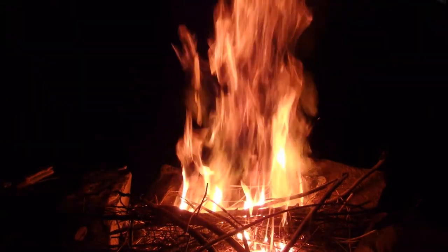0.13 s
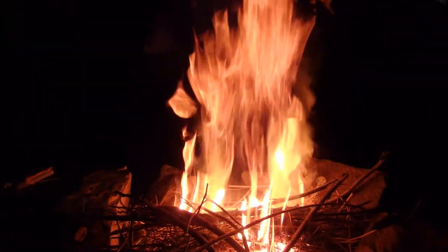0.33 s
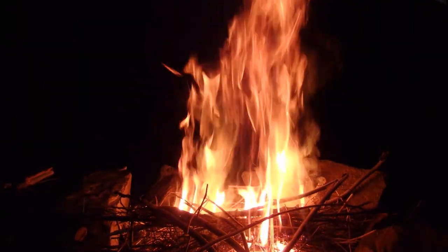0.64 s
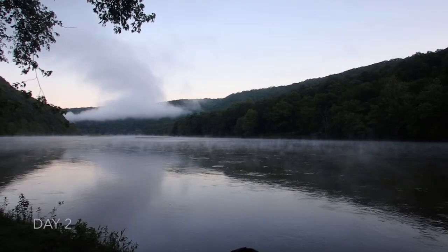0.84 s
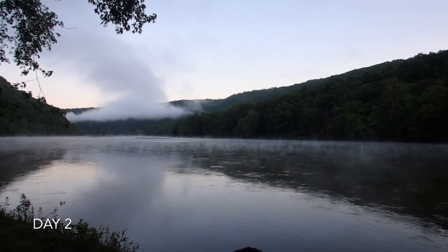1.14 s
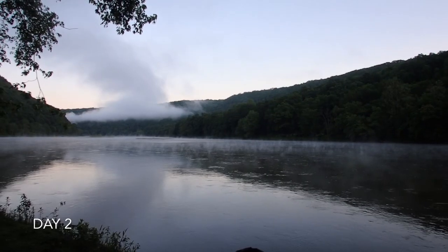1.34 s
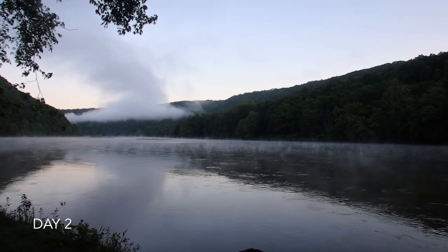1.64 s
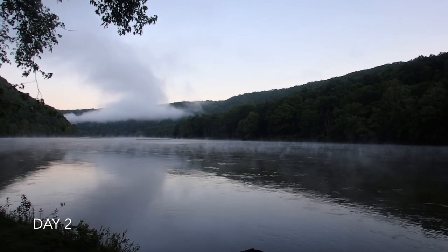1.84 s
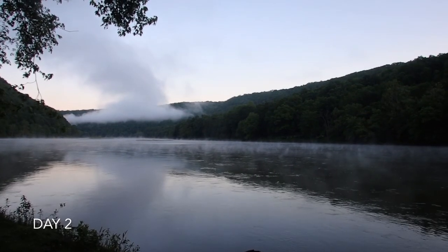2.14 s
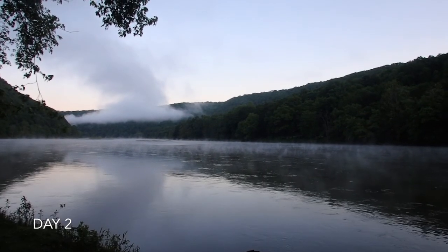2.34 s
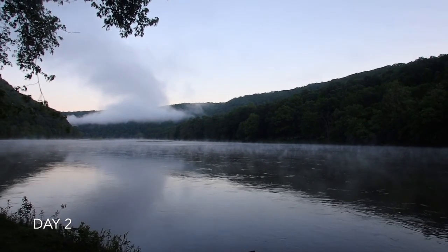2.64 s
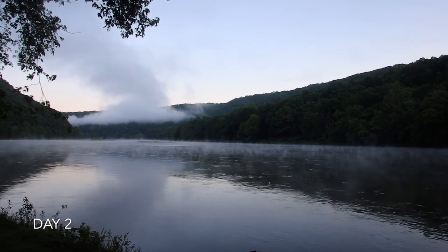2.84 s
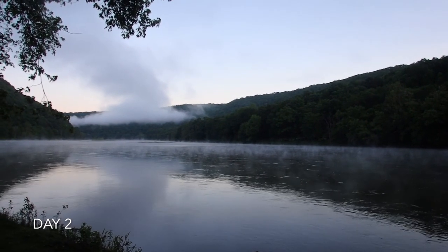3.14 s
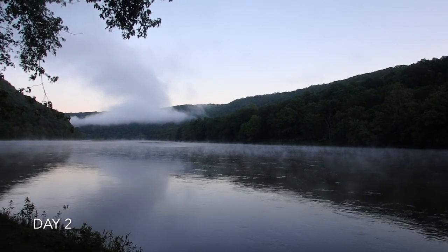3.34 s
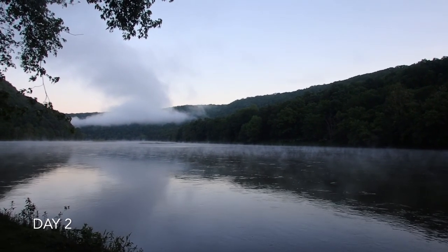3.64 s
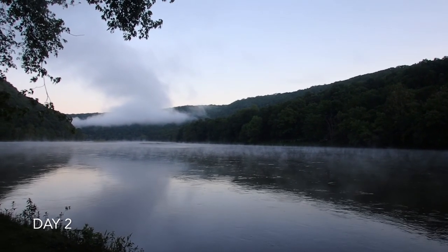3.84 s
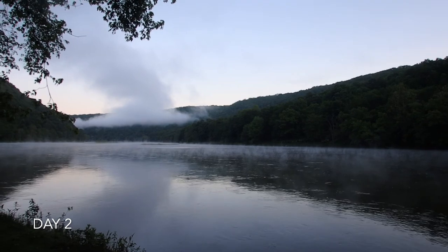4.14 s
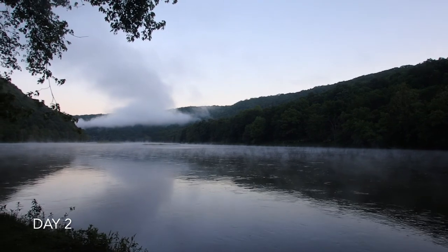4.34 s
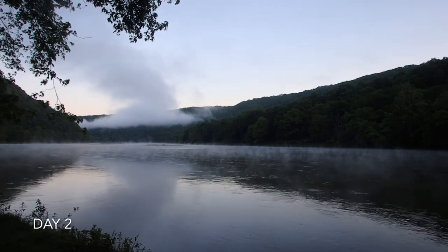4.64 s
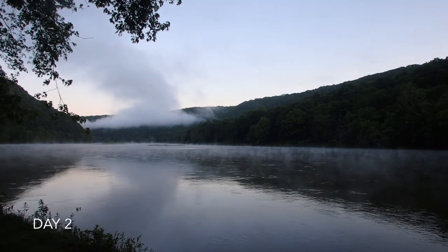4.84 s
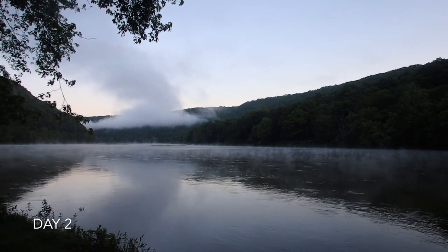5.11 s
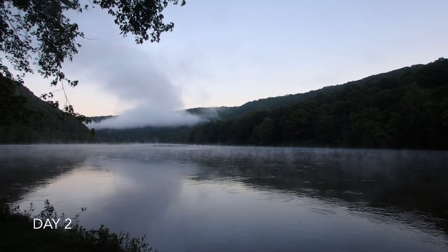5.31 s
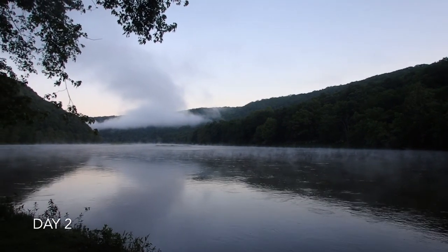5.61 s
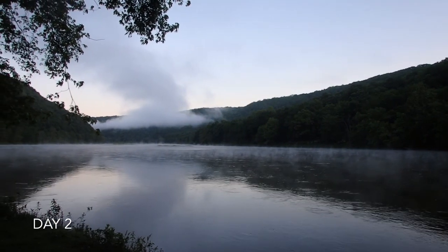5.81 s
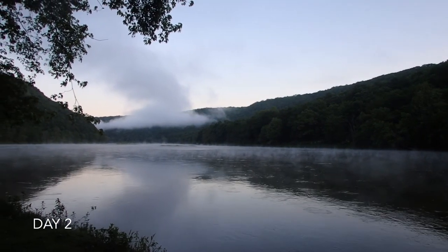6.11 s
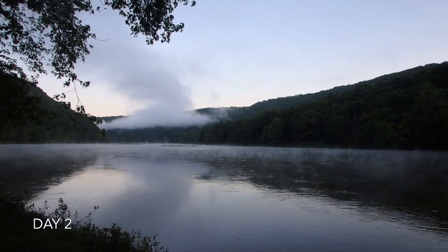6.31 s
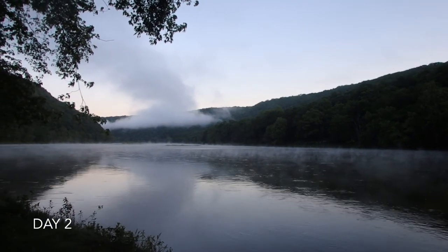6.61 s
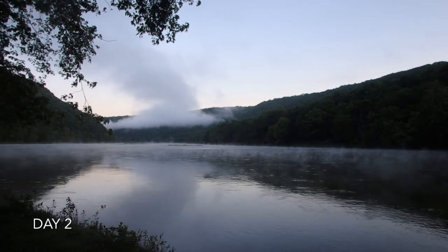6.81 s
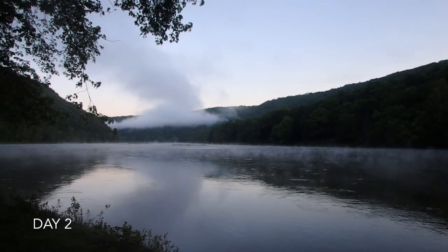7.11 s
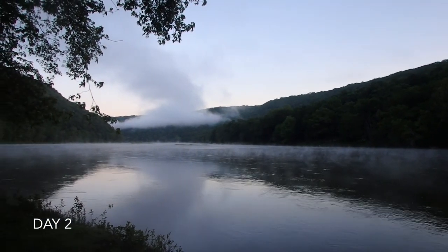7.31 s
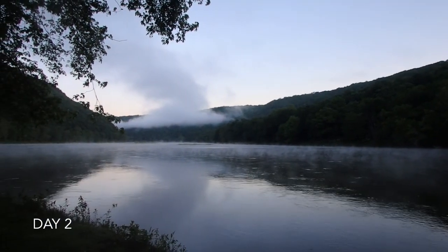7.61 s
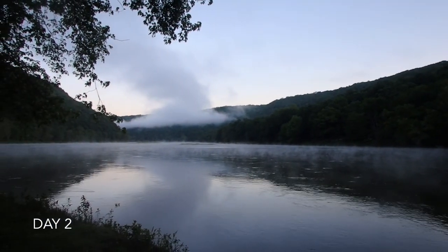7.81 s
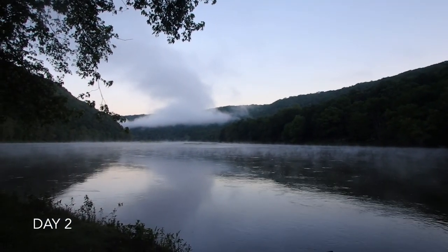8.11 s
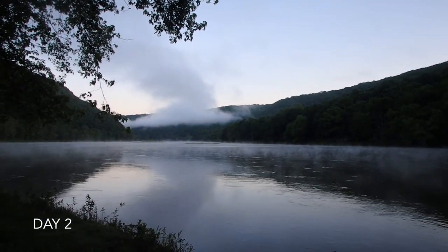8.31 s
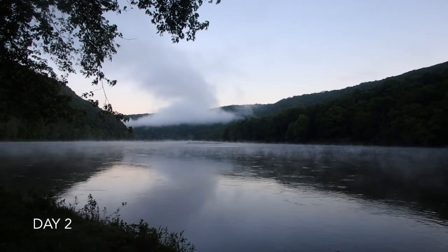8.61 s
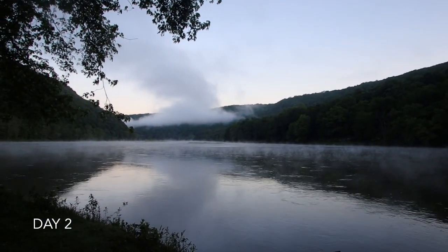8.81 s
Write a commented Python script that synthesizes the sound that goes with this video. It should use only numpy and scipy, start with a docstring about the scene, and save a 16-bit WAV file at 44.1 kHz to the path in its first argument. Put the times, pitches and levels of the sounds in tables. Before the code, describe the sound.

A campfire flutters and sizzles with quick wood pops, the sharpest at about 0.1 seconds. At 0.8 seconds it gives way to a quiet riverbank: a soft, even wash of water, low wind rumble on the microphone and a faint blur of distant chirping. A bird slightly to the right whistles short slurred phrases at about 1, 2.1, 3.4, 4.9, 6.3, 7.5 and 8.8 seconds, with a light forest echo. Thin twitters appear between 1 and 3 seconds, and far crows caw hoarsely throughout. From about 4.7 to 6.3 seconds a second bird sings a very high two-note see-saw further right. The wind grows gustier in the second half, with soft low bumps around 7 to 8.5 seconds. A light hiss runs underneath, and a tiny camera motor whines very faintly near 2 and 6 seconds.

```python
"""A campfire flutters, sizzles and pops as steam bursts from the wood. In under a second it gives way to
a misty river at dawn, where air rumbles on the microphone, small birds twitter and crows call far down
the valley. A vireo whistles short slurred phrases from the bank; about halfway, a warbler see-saws high
in the trees. Throughout, a small camera adds hiss and narrow notches; twice its lens motor faintly whines."""
import sys
import numpy as np
from scipy import signal
from scipy.fft import rfft, irfft, next_fast_len
from scipy.io import wavfile
from scipy.ndimage import uniform_filter1d

SR = 44100
rng = np.random.default_rng(int(sys.argv[2]) if len(sys.argv) > 2 else 0)


def generate_wav(signal):
    """Clip the signal to [-1, 1] and save it as 16-bit WAV at the path in sys.argv[1]."""
    frames = np.transpose(np.atleast_2d(signal))
    scaled = np.clip(frames, -1, 1) * 32767
    pcm = np.round(scaled).astype(np.int16)
    wavfile.write(sys.argv[1], SR, pcm)


N = 394694
TIME = np.arange(N) / SR
FIRE_END_S, CROSSFADE_S = .815, .06


def undb(db):
    """Decibels to gain."""
    return 10 ** (np.asarray(db) / 20)


def unit(x):
    """Scale to rms 1."""
    return x / np.sqrt(np.mean(x ** 2))


def curves(table):
    """Each column of a table of timed rows, sample by sample."""
    times, *columns = np.transpose(table)
    return [np.interp(TIME, times, column) for column in columns]


def pan(db):
    """Left and right gains for a level difference; negative is to the right."""
    return undb(np.array([[.5], [-.5]]) * db)


def add(out, s, x):
    """Mix a short sound into a track at time s."""
    i = max(int(s * SR), 0)
    out[..., i:i + x.shape[-1]] += x[..., :max(N - i, 0)]


def gains(spectrum, size):
    """An EQ curve of (Hz, dB) points as gains on the bins of a transform."""
    hz, db = np.transpose(spectrum)
    bin_hz = np.arange(size // 2 + 1) * SR / size
    return undb(np.interp(np.log(bin_hz + 1), np.log(hz), db))


def colour(x, spectrum):
    """Filter by an EQ curve; the result has rms 1."""
    size = next_fast_len(N)
    return unit(irfft(rfft(x, size) * gains(spectrum, size), size)[..., :N])


def noise(likeness, size=N):
    """Stereo white noise with a given correlation between the ears."""
    centre = np.sqrt(likeness) * rng.standard_normal(size)
    return centre + np.sqrt(1 - likeness) * rng.standard_normal((2, size))


def walk(rate):
    """Smooth random wander of rms 1, with `rate` turning points a second."""
    knots = rng.standard_normal(N // 40)
    wander = np.interp(TIME * rate, np.arange(len(knots)), knots)
    return unit(uniform_filter1d(wander, int(SR / rate / 2) + 1))


def sine(hz):
    """A sine that follows a pitch curve."""
    return np.sin(2 * np.pi * np.cumsum(hz) / SR)


def whistle(rows, edge_s=.00282):
    """A pure tone gliding smoothly through (s, Hz, dB) points."""
    s, hz, db = np.transpose(rows)
    t = np.arange(s[0] - edge_s, s[-1] + edge_s, 1 / SR)
    pitch = uniform_filter1d(np.interp(t, s, hz), size=180)
    edges = np.clip(np.minimum(t - t[0], t[-1] - t) / (2 * edge_s), 0, 1)
    return np.sqrt(2) * edges * undb(np.interp(t, s, db)) * sine(pitch)


def woods(x, t60, build_s, likeness):
    """Scatter from trunks and slopes: a diffuse echo that builds up and dies away."""
    t = TIME[:SR * 3 // 2]
    envelope = (1 - np.exp(-t / build_s)) * np.exp(-np.log(1000) * t / t60)
    echo = noise(likeness, size=len(t)) * envelope
    echo /= np.sqrt(np.sum(echo ** 2) / 2)
    return signal.fftconvolve(x[None], echo, axes=1)[:, :N]


# bright noise floor: (frequency [Hz], gain [dB])
HISS_EQ = [(500, -9), (4000, 4.5), (8000, 2.5), (11000, 3.5), (13500, 7), (15000, -8)]
# lens moves: (start [s], end [s], lower whine [Hz], its level [dB])
LENS_MOVES = [(1.955, 2.546, 8750, -75), (5.87, 6.717, 9550, -74)]


def camera(hiss_db=-56, upper_hz=13820, upper_db=5, width_hz=200):
    """Preamplifier hiss and the two thin whines of the lens motor."""
    def whine(hz):
        band = [(hz + k * width_hz, db) for k, db in [(-2, -50), (-1, -10), (0, 0), (1, -8), (2, -50)]]
        return colour(noise(.79), band)

    out = undb(hiss_db) * colour(noise(.12), HISS_EQ)
    for start, end, hz, db in LENS_MOVES:
        running = (TIME > start) & (TIME < end)
        out += undb(db) * (whine(hz) + undb(upper_db) * whine(upper_hz)) * running
    return out


# soft water bed: (frequency [Hz], gain [dB])
RIVER_EQ = [(60, -4), (200, 1), (400, -2), (700, -2.5), (1100, -5.5), (1500, -5), (2000, -12.5), (2500, -2),
            (4000, -10.5), (6000, -38), (12000, -56)]


def river(level_db=-48.5):
    """The wide, even wash of water and valley; its bass comes from all around."""
    bass = signal.sosfilt(signal.butter(1, 450, fs=SR, output="sos"), noise(0))
    wash = colour(noise(.77) + 1.41 * bass, RIVER_EQ)
    return wash * undb(level_db + .66 * walk(3.31)) * pan(-1.7)


# fader ride of the gusts: (time [s], level [dB])
GUSTS = [(0.87, -44.5), (0.97, -58), (1.07, -44.0), (1.18, -51.5), (1.89, -47.5), (2.0, -52.5), (2.3, -40),
         (2.4, -46.5), (2.81, -51.9), (3.32, -42.5), (3.53, -50), (3.73, -35.5), (4.25, -48), (4.76, -37),
         (6.19, -43), (6.6, -34.5), (6.7, -40.5), (6.9, -36.5), (7.01, -30.5), (7.42, -44), (7.52, -41.3),
         (7.82, -44), (8.03, -30.7), (8.13, -47), (8.23, -38.5), (8.64, -50), (8.95, -50.5)]
# low wind rumble: (frequency [Hz], gain [dB])
RUMBLE_EQ = [(20, -10.5), (40, -1.5), (65, 3.5), (100, -3.5), (160, -10), (250, -27), (800, -54)]
# soft low bumps: (time [s], relative level [dB])
AIR_BUMPS = [(2.553, -31.5), (7.049, -26.5), (7.225, -28.5), (7.454, -24.5), (7.699, -28), (8.445, -32.5)]


def breeze(bump_s=.0069, gust_db=-38, flutter_db=-15):
    """Eddies rumble on the microphone ports, with a higher flutter in gusts and now and then a bump."""
    db = curves(GUSTS)[0] + walk(16)
    rumble = colour(noise(.22), RUMBLE_EQ) * undb(db) * pan(-.8 + walk(3.26))
    flutter = colour(noise(.049), [(80, -8), (150, 8), (300, -4), (700, -46)])
    flutter *= undb(2 * db - gust_db + flutter_db)  # small eddies grow twice as fast as large ones
    t = TIME[:SR // 8] / bump_s
    bumps = np.zeros(N)
    for s, level_db in AIR_BUMPS:
        add(bumps, s - bump_s, undb(level_db) * t * np.exp(1 - t))
    thud = bumps * .5 * colour(noise(1), [(30, -29), (80, 9.5), (220, -6), (450, -17.5), (1200, -49)])
    return rumble + (flutter + thud) * pan(-4)


# bands of distant birdsong: (frequency [Hz], gain [dB])
CHORUS_EQ = [(1900, -69), (2400, 8.5), (2700, -27), (3400, 1), (3950, -0.5), (4400, -36), (5500, 0),
             (6800, -1), (8500, -30)]


def dawn_chorus(level_db=-57, spread_db=8, count=300):
    """Chirps from the far bank, each slurring steeply up or down, blur into echo and a bed of noise."""
    chirps = np.zeros(N)
    for when, pitch, bend, size in rng.random((count, 4)):
        hz = 2400 + 2400 * pitch ** 2
        ratio = 1.25 if bend > .5 else .8
        chirp = whistle([(0, hz, -3), (.025, hz * np.sqrt(ratio), 9), (.05, hz * ratio, -7)])
        add(chirps, when * N / SR, undb(spread_db * size) * chirp)
    echo = woods(chirps, t60=1, build_s=.005, likeness=.82)
    blur = unit(.81 * chirps + echo) + .87 * noise(.56)
    return undb(level_db) * colour(blur, CHORUS_EQ) * pan(-1.2)


# distant crow cues: (time [s], length [s], relative level [dB])
CROW_CAWS = [(0.888, 0.14, -54), (1.169, 0.086, -58), (1.487, 0.127, -53), (2.104, 0.14, -53.5),
             (2.829, 0.13, -52.5), (3.796, 0.12, -54.5), (4.228, 0.13, -55), (4.456, 0.07, -57),
             (4.783, 0.13, -54.5), (5.505, .12, -55), (6.026, 0.08, -51.5), (6.326, 0.12, -53),
             (6.568, 0.081, -56), (6.85, 0.077, -51), (6.957, 0.088, -52.5), (7.179, 0.073, -51.5),
             (7.569, 0.089, -48), (7.656, 0.057, -55), (7.95, 0.094, -54.5), (8.21, 0.0925, -53),
             (8.86, 0.069, -51)]


def crows(base_hz=1531, drop_hz_per_s=650, arch=.15, jitter=.18, rattle_hz=210.2, hill_s=.19):
    """Hoarse arched caws; only the strongest partial and its rasp carry this far, and the hill answers."""
    calls = np.zeros(N)
    for s, length, db in CROW_CAWS:
        u = np.linspace(-1, 1, int(length * SR))
        top_hz = base_hz - drop_hz_per_s * length  # short, urgent caws sit higher
        pitch = top_hz * (1 - arch * (u - .1) ** 2)
        # the voice is unsteady from one cycle to the next
        pitch *= 1 + jitter * uniform_filter1d(rng.standard_normal(len(u)), size=160)
        add(calls, s, undb(db) * unit(sine(pitch) * (1 - u ** 2) ** .23))
    # an uneven rattle in the throat spreads sidebands round the partial
    calls *= 1 + .3 * sine(rattle_hz + 60 * walk(120)) + .3 * walk(200)
    answered = calls.copy()
    add(answered, hill_s, undb(-8) * calls)
    echo = woods(answered, t60=.67, build_s=.00082, likeness=.96)
    return undb(-2) * (calls + echo) * pan(-.8)


# twitter cues: (time [s], length [s], start pitch [Hz], end pitch [Hz], relative level [dB])
TWITTER_CUES = [(0.88, 0.048, 5020, 5760, -51), (1.672, 0.019, 3460, 3980, -40.5),
                (1.794, 0.033, 5300, 6000, -48.5), (2.047, 0.037, 5170, 5900, -52),
                (2.685, .025, 3900, 3480, -42), (2.771, 0.026, 6600, 4720, -51),
                (2.807, 0.019, 5000, 6100, -53), (2.955, 0.021, 6200, 4830, -52),
                (2.996, 0.026, 4970, 6000, -64)]


def small_birds(direct_db=-7, echo_db=-5, flutter_db=3):
    """A few thin, gliding twitters ring on among the trees."""
    song = np.zeros(N)
    for s, length, from_hz, to_hz, db in TWITTER_CUES:
        glide = [(0, from_hz, -4), (length / 2, (from_hz + to_hz) / 2, 0), (length, to_hz, -4)]
        add(song, s, undb(db) * whistle(glide))
    song *= undb(flutter_db * walk(250))
    return undb(direct_db) * song + undb(echo_db) * woods(song, t60=.95, build_s=.003, likeness=.46)


# the see-saw's two notes: (time in the note [s], pitch [Hz], relative level [dB])
LOW_NOTE = [(0, 6520, 4), (.035, 6746, 2), (.065, 7240, 6.5), (.085, 5930, 0.5), (.11, 5550, 4.5),
            (.145, 5485, 5.5)]
HIGH_NOTE = [(0, 6920, 2), (.018, 7770, 3), (.036, 8680, -7), (.055, 7900, 5), (.075, 7680, -14)]


def warbler(start_s=4.724, period_s=.345, slowing_s=.002, high_after_s=.222, swell_s=.49, count=5):
    """Two thin notes in turn, well to the right, so deep in the trees that scatter outweighs the song."""
    song = np.zeros(N)
    for k in range(count):
        s = start_s + k * (period_s + k * slowing_s)
        add(song, s, whistle(LOW_NOTE))
        if k < count - 1:
            add(song, s + high_after_s, whistle(HIGH_NOTE))
    soft_start_db = -9 * np.clip(1 - (TIME - start_s) / swell_s, 0, 1)
    song *= undb(-52 + soft_start_db + 2 * walk(150))
    leaves = .5 * woods(song, t60=.13, build_s=.003, likeness=.4)
    forest = undb(-4) * woods(song, t60=.91, build_s=.038, likeness=.69)
    return (.4 * song + leaves + forest) * pan(-7.5)


# brittle tone of cracking wood: (frequency [Hz], gain [dB])
WOOD_EQ = [(300, -5.5), (1000, -6), (2000, -7), (2700, -2.5), (3800, 2), (4600, -6.5), (5800, 2),
           (8000, -3), (10000, -3), (14000, -15)]


def snap(ring_s, tail_db, shock, tail_s=.004):
    """A pocket of steam bursts: a sharp shock, a few ms of splintering, a scatter off the logs."""
    t = TIME[:2048]
    envelope = np.exp(-(t / ring_s) ** 2) + undb(tail_db) * np.exp(-t / tail_s)
    burst = noise(.31, size=len(t)) * envelope
    burst[:, 0] -= shock
    # minimum-phase EQ keeps the attack sharp
    cepstrum = irfft(np.log(gains(WOOD_EQ, len(t))))
    cepstrum[1:len(t) // 2] *= 2
    cepstrum[len(t) // 2 + 1:] = 0
    pop = irfft(rfft(burst) * np.exp(rfft(cepstrum)))
    return pop / np.abs(pop.mean(axis=0)).max()


# fader rides of the blaze: (time [s], relative roar level [dB], relative sizzle level [dB])
BLAZE_LEVELS = [(0.0, -47, -53), (0.626, -43.5, -49), (0.78, -45, -46.5)]
# dark flames and bright sap: (frequency [Hz], gain [dB])
ROAR_EQ = [(15, -40), (25, -13), (59, -2), (135, -1.5), (332, -15.5), (666, -19), (893, -24), (1050, -23.5),
           (2000, -32.5), (2600, -55), (4400, -120)]
SIZZLE_EQ = [(500, -20), (1400, 0.5), (2000, -2), (2600, 4.5), (3800, -0.5), (4600, -5), (5800, -2),
             (8500, -4.5), (10000, -8.5), (14000, -15)]


def blaze(tick_count=60):
    """Flames flutter, sap sizzles and small ticks break out of the wood."""
    roar_db, sizzle_db = curves(BLAZE_LEVELS)
    roar = colour(noise(.8), ROAR_EQ) * undb(roar_db + walk(22.2) + 6)
    sizzle = colour(noise(.96), SIZZLE_EQ) * undb(sizzle_db + walk(86.6) + 3.05)
    ticks = np.zeros((2, N))
    for when, smallness, side in rng.random((tick_count, 3)):
        tick = snap(ring_s=.0013, tail_db=1, shock=10) * pan(4 * (side - .5))
        tick_db = 8 - 6 * np.log(smallness + .073)  # most are tiny, a few stand out
        add(ticks, when * FIRE_END_S, tick * undb(tick_db))
    return roar + sizzle + ticks * undb(sizzle_db)


# foreground fire hits: (time [s], relative peak level [dB])
WOOD_POPS = [(0.0297, -24), (0.1119, -9.5), (0.164, -25), (0.257, -30), (0.281, -24.5), (0.354, -28),
             (0.38, -21.5), (0.411, -27), (0.4512, -27.5), (0.5185, -25.5), (0.5581, -20.5), (0.609, -27),
             (0.6223, -24), (0.6654, -25), (0.6835, -20.5), (0.701, -21), (0.797, -33)]


def pops(boost_db=2.7, lag_s=.0015):
    """Larger pockets of steam crack the burning wood."""
    out = np.zeros((2, N))
    for s, db in WOOD_POPS:
        add(out, s + lag_s, undb(db + boost_db) * snap(ring_s=.0026, tail_db=-14, shock=8))
    return out * pan(-1.7)


# the vireo's voice, strongest in mid-range: (pitch [Hz], gain [dB])
VOICE_EQ = [(2300, -3.5), (3050, -7), (3400, 0.5), (3700, 3.5), (4050, 1.5), (4450, -9), (5700, -3.5),
            (6400, -9)]


def slur(rise_s, fall_s, start_hz, top_hz, end_hz, rise_round, fall_round):
    """One vireo note: the pitch sweeps up and down, and the loudness depends on the pitch."""
    attack_s, release_s, swell_db_per_octave = .011, .0056, 4
    t = np.arange(0, rise_s + fall_s, 1 / SR)
    from_top = np.sin(np.pi / 2 * np.interp(t, [0, rise_s, rise_s + fall_s], [1, 0, 1]))
    rise = top_hz - (top_hz - start_hz) * from_top ** rise_round
    fall = top_hz - (top_hz - end_hz) * from_top ** fall_round
    pitch = np.where(t < rise_s, rise, fall)
    envelope = np.clip(np.minimum(t / attack_s, (t[-1] - t) / release_s), 0, 1) ** .6
    # in wide slurs the bird climbs softly and pushes on the way down
    effort = np.interp(t, [0, rise_s, rise_s + attack_s], [-.5, -.2, .35])
    swell_db = swell_db_per_octave * np.log2(top_hz / start_hz) * effort
    voice_db = np.interp(pitch, *np.transpose(VOICE_EQ))
    return np.sqrt(2) * envelope * undb(voice_db + swell_db) * sine(pitch)


# the lead melody; roundness under 1 is a spike, 2 or more an arch: (time [s], rise [s], fall [s],
# start pitch [Hz], top pitch [Hz], end pitch [Hz], rise roundness, fall roundness, relative level [dB])
VIREO_NOTES = [(0.959, 0.014, 0.039, 3380, 4540.0, 2900, 1.6, 1.25, -43.5),
               (1.015, 0.031, 0.053, 3230.0, 4030, 2765, 2.3, 0.52, -39),
               (1.138, 0.016, 0.049, 3710, 5010, 2780, 1.1, 0.67, -40),
               (1.2, 0.019, 0.024, 2794, 3630, 2840, 3.2, 2, -37.5),
               (2.114, 0.011, 0.051, 3190, 3730.0, 2350.0, 0.8, 0.62, -42),
               (2.173, 0.053, 0.017, 2360.0, 3640, 3170, 2.2, 1, -37.5),
               (2.264, 0.022, 0.11, 3426, 5370, 2483, 2.1, 0.43, -39),
               (3.35, 0.074, 0.044, 3690, 5760, 3090.0, 0.94, 0.79, -39.5),
               (3.528, 0.067, 0.041, 3485, 5790, 3140, 0.82, 1.06, -37),
               (3.681, 0.052, 0.025, 2280.0, 3025, 2300, 2.4, 2.3, -36),
               (3.765, 0.045, 0.013, 3460, 4166, 3120, 1.93, 2.6, -35),
               (4.895, 0.03, 0.041, 3446, 3756, 2710, 2.1, 2.9, -38),
               (4.974, 0.059, 0.0078, 2790.0, 4560, 4650, 3, 2.0, -37),
               (5.103, 0.016, 0.03, 2310, 2740, 2420, 2.0, 2.0, -39.5),
               (5.136, 0.016, 0.063, 2420, 3290, 2220.0, 3.4, 1.7, -38),
               (5.215, 0.032, 0.023, 2240, 2934, 2800, 2.41, 2.0, -37),
               (6.259, 0.012, 0.042, 3400, 4640.0, 2890.0, 1.3, 1.1, -41),
               (6.317, 0.045, 0.048, 3530, 5420, 2970, 1.64, 0.82, -35.5),
               (6.479, 0.026, 0.019, 2300, 2910, 2770, 2.3, 2.2, -36.5),
               (6.538, 0.036, 0.035, 3520, 3804, 2470, 0.44, 0.47, -35.5),
               (7.505, 0.018, 0.022, 4300, 4480, 3930, 2, 2, -47),
               (7.544, 0.023, 0.054, 3950, 6360, 4390, 1.8, 0.26, -38.5),
               (7.674, 0.012, 0.038, 3240, 3940, 2486, 0.98, 0.58, -37),
               (7.721, 0.057, 0.059, 2510, 4070.0, 2370.0, 1.2, 0.99, -36.5),
               (7.836, 0.029, 0.004, 2325, 2980, 2970.0, 1.8, 2.0, -36),
               (8.755, 0.01, 0.015, 3360.0, 4140, 3630, 1.3, 1.46, -42),
               (8.778, 0.026, 0.046, 3640, 4990, 3110, 0.9, 0.82, -40),
               (8.856, 0.042, 0.019, 3490, 5340, 4300, 1.04, 1.1, -38)]


def vireo(leaves_db=-11, forest_db=-8, flutter_db=2.5, shade_db=-5):
    """Slurred whistles from a tree a little to the right, with quick leaf scatter and a forest echo."""
    song = np.zeros(N)
    for s, *shape, db in VIREO_NOTES:
        add(song, s, undb(db) * slur(*shape))
    song *= undb(flutter_db * walk(300))
    # foliage shades the highest notes from the direct path and scatters them instead
    high = signal.sosfiltfilt(signal.butter(6, 4250, "high", fs=SR, output="sos"), song)
    direct = song - (1 - undb(shade_db)) * high
    leaves = undb(leaves_db) * woods(song + high, t60=.12, build_s=.0066, likeness=1)
    forest = undb(forest_db) * woods(song, t60=.65, build_s=.033, likeness=.93)
    return (direct + leaves + forest) * pan(-4)


def scene():
    """The fire crossfades into the river bank over the camera's own noise."""
    dawn = np.clip((TIME - FIRE_END_S) / CROSSFADE_S + 1, 0, 1)
    bank = river() + breeze() + vireo() + warbler() + small_birds() + dawn_chorus() + crows()
    fire = (1 - dawn) * blaze() + pops()
    return fire + dawn * bank + camera()


# narrow cuts in the treble: (centre [Hz], width [Hz])
CAMERA_NOTCHES = [(2200, 155), (3100, 60), (4100, 90), (5100, 90), (6100, 130)]


def record(dry):
    """The camera cuts narrow notches into the treble and closes the top."""
    for hz, width_hz in CAMERA_NOTCHES:
        dry = signal.lfilter(*signal.iirnotch(hz, hz / width_hz, fs=SR), dry)
    top_hz = 14400
    return signal.sosfilt(signal.ellip(8, .2, 70, top_hz, fs=SR, output="sos"), dry)


dry = scene()
out = record(dry)
generate_wav(out)
```